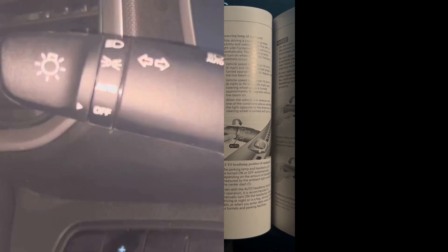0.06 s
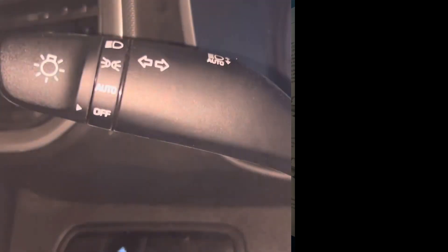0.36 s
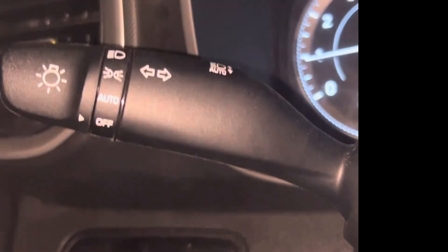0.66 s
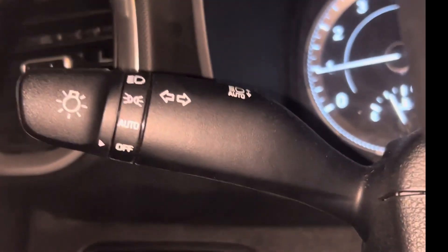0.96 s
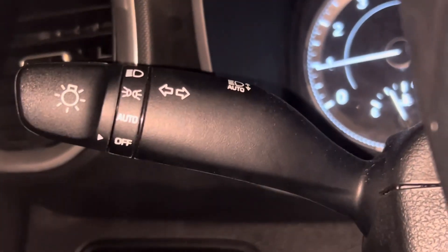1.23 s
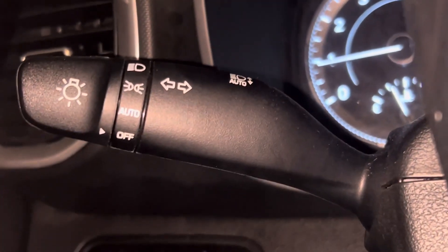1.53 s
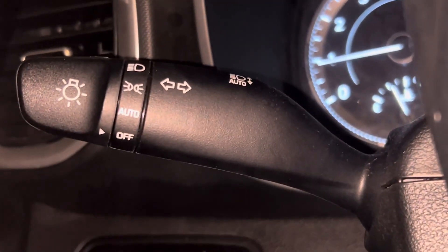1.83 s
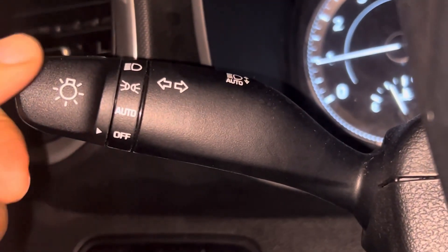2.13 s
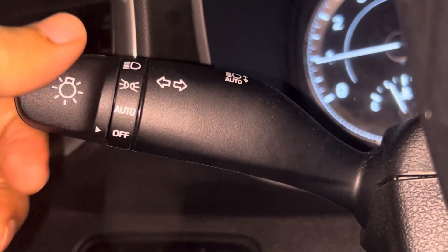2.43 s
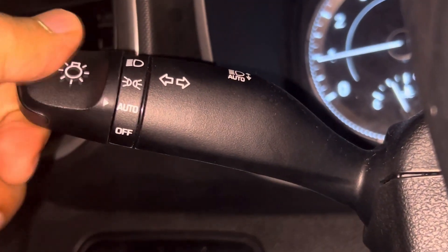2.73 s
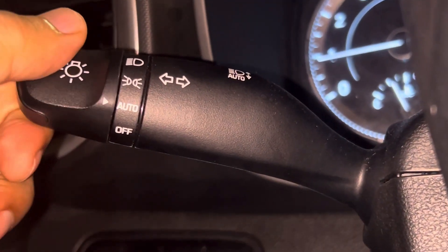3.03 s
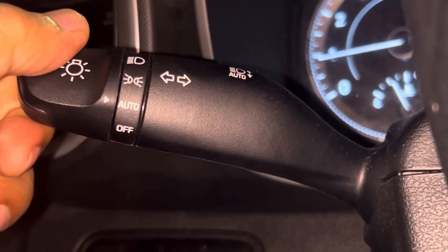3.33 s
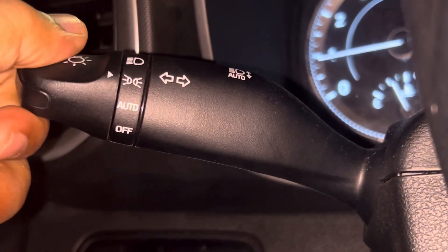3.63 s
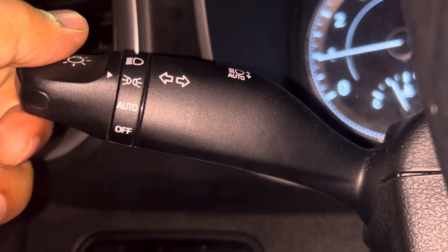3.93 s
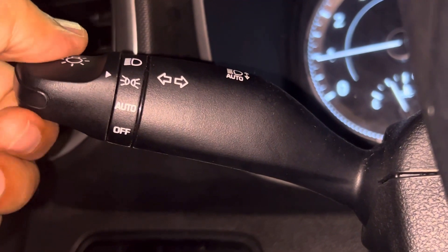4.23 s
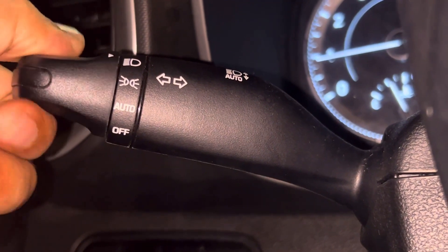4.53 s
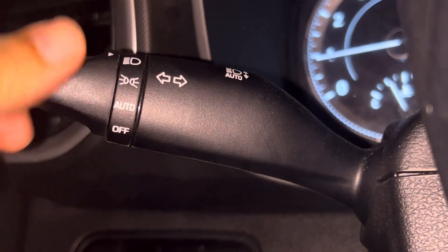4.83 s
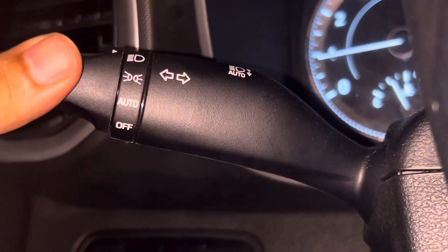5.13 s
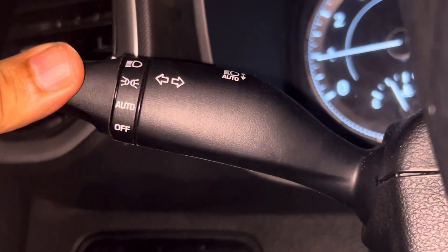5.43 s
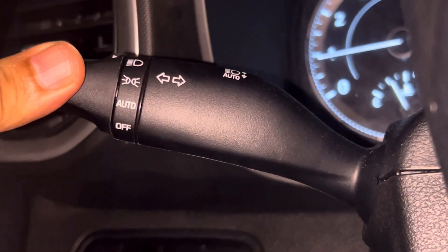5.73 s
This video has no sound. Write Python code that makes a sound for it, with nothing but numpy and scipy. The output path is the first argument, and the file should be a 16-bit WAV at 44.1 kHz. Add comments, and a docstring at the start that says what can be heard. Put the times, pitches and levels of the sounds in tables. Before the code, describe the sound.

A quiet, low hum and rumble of an idling engine, heard inside the car, runs throughout. It starts thin, drops out for an instant and returns with a tiny pop at 0.2 seconds. A light tap on the microphone comes at 0.7 seconds, then faint handling hisses and a soft tick around 1.4. After two tiny nail ticks near 2.5, the plastic headlight knob on the steering column stalk snaps through three stops at about 2.7, 3.5 and 4.3 seconds. These clicks are close, sharp, slightly hollow and a little to the right, the first two with a low thud. A tenth of a second after each, a relay ticks behind the dashboard. A lighter knock falls at 4.0, and soft ones around 4.6. Fingers bump the stalk with dull plastic knocks at 5.1 and 5.3, with soft scuffs and thuds until 5.5, leaving the hum.

```python
"""Inside an idling car, a hand turns the headlight knob on the steering column stalk by three clicks.
At each click stop (a detent) a plunger snaps home and sets the plastic stalk ringing. About a tenth
of a second later a relay, an electric switch behind the dashboard, answers with a rattle of contacts.
Soft hisses swell and fade, fingers bump the stalk, and the engine hums under it all.
The sound starts faint, drops out for a moment and comes back with a small pop."""
import sys
import numpy as np
from scipy import signal
from scipy.fft import rfft, irfft, next_fast_len
from scipy.io import wavfile

SR = 44100
rng = np.random.default_rng(int(sys.argv[2]) if len(sys.argv) > 2 else 0)


def unload_wav(signal):
    """Save mono or channel-first audio to the path in sys.argv[1] as 16-bit WAV at rate SR, clipped to [-1, 1]."""
    wavfile.write(
        sys.argv[1],
        SR,
        np.round(np.clip(np.atleast_2d(signal).T, -1, 1) * 32767).astype(np.int16),
    )


N = 254898
SIZE = 16384  # samples in one short sound
AGE, TIME = np.arange(SIZE) / SR, np.arange(N) / SR  # seconds into a short sound, and into the scene

# Tones of the idling engine. Each row: multiple of the firing rate, level in dB.
ENGINE_TONES = [(1, -50), (2, -61), (3, -55.5), (4, -56), (5, -62.5), (6, -66), (10, -73)]
# Rumble of the car body, and moving air. Each row: frequency in Hz, relative level in dB.
RUMBLE_COLOUR = [(15, -46.5), (35, -9), (52, 4.5), (66, 1.5), (85, 1), (105, 5.5), (135, -16.5), (185, -6),
                 (220, -13.5), (300, -12), (420, -25), (700, -63)]
AIR_COLOUR = [(200, -20.5), (500, 11.5), (750, 2), (1100, 4), (1400, -2.5), (1800, -3.5), (2400, -20.5),
              (3500, -22.5), (7000, -32.5), (10000, -41), (13000, -30), (15500, -41.5)]
# Thuds in the steering column, and jolts of the microphone. Each row: start in seconds, level in dB.
COLUMN_THUDS = [(2.749, -1.5), (3.511, -2), (5.326, -4), (5.354, -4.5), (5.469, -10)]
MIC_JOLTS = [(.718, -25.5), (1.015, -29)]
# Ringing of the steering column, the microphone case, the relay case and the stalk.
# Each row: pitch in Hz, relative level in dB, seconds to fall 60 dB when left to ring freely.
COLUMN_MODES = [(101.3, -30, .11), (139, -37.5, 0.12), (190, -35.5, 0.15)]
MIC_CASE_MODES = [(240, -21.5, 0.013), (550, -34, 0.018), (773, -32.5, 0.02), (2210, -50.5, 0.021),
                  (4100, -59, 0.019)]
RELAY_MODES = [(1893, -50.5, 0.058), (2235, -54.5, 0.064), (2640, -41, 0.02), (2930, -50, 0.048),
               (3350, -57, 0.035), (4090, -66, 0.12), (4530, -55, .05), (5400, -59, .03),
               (6330, -54, 0.035), (7050, -61, .03), (7940, -51.5, 0.039)]
STALK_MODES = [(362.2, -22.5, 0.079), (453, -34, 0.078), (585, -33, 0.076), (696, -33.5, 0.051),
               (800, -31.5, 0.031), (1038, -37, 0.065), (1235, -49, 0.11), (1460, -40, 0.05),
               (1740, -34, 0.066), (1885, -39, 0.06), (2215, -46.5, 0.05), (2480, -44.5, 0.045),
               (2728, -45.5, 0.03), (2950, -45, 0.045), (4030, -43, 0.028), (4250, -39.5, 0.026),
               (4480, -42, .035), (5270, -50, .025), (6090, -38.5, 0.025), (6340, -39, 0.024),
               (6700, -39.5, .026), (6930, -43, .026), (7600, -44.5, .024)]
# Swells of broad hiss and of more resonant hiss. Each row: time of full level, rise and hold,
# all in seconds, level in dB, extra treble in dB, fall in dB per second.
BROAD_SWELLS = [(.045, 0.075, 0.042, -77.5, 0, 107), (.715, 0.029, 0.064, -69, 4, 107),
                (.985, 0.022, 0.014, -78.5, 4.5, 130), (1.388, 0.026, 0.057, -57, -0.5, 111),
                (1.47, .03, 0.045, -58.5, 3.5, 97), (1.65, 0.076, 0.55, -72, 2.5, 105),
                (2.29, 0.067, 0.16, -77.5, 8.5, 103.5), (5.238, .004, .002, -80, 3, 108),
                (5.298, .007, 0.0074, -64.5, -3.5, 217)]
RESONANT_SWELLS = [(2.61, 0.044, 0.051, -69.5, -0.5, 104.5), (3.445, 0.014, .005, -71, 3, 128),
                   (3.491, 0.0044, 0.0071, -63, -2, 400), (3.975, 0.0075, 0.14, -66.5, 2.5, 104.5),
                   (4.1, 0.057, 0.13, -66.5, 1.5, 148), (4.3, 0.033, 0.041, -71.5, 6, 130),
                   (4.55, 0.011, 0.16, -67.5, 5, 150)]
# Tone of the broad hiss, the resonant hiss, and dragging finger pads.
# Each row: frequency in Hz, relative level in dB.
BROAD_COLOUR = [(300, -6), (900, 2), (1400, -3), (1750, 7.5), (2200, 4), (2550, 2), (3000, 1), (3700, -2),
                (5200, -1.5), (6200, -2.5), (7300, -4), (8500, -5), (9200, -5), (13000, -2.5), (15100, -3),
                (15500, -25)]
RESONANT_COLOUR = [(300, -5.5), (600, 2.5), (1000, 4.5), (1450, -3.5), (1750, 13), (2050, 7.5),
                   (2450, -0.5), (2900, 2.5), (3650, -1.5), (4100, 4), (4400, -1), (4800, 3), (5500, -9.5),
                   (6150, -1), (7000, -5.5), (8300, -3), (9200, -7.5), (12200, -3.5), (14500, -2),
                   (15500, -21)]
PAD_COLOUR = [(120, -6), (260, 6.5), (420, 2.5), (600, -4), (1000, -9.5), (1900, -10), (3200, -23),
              (9000, -41)]
# Finger pads dragging over plastic. Each row: middle in seconds, level in dB,
# seconds the swell spreads to either side, extra dB from 2 kHz up.
PAD_SCUFFS = [(0.79, -64, 0.069, 3), (1.0, -69.5, .018, 5.5), (1.378, -65.5, 0.033, 9),
              (4.591, -62, 0.017, 2), (4.703, -64, 0.028, -9), (5.111, -54, 0.036, -2.5),
              (5.321, -51, 0.039, -4.5), (5.482, -51.5, 0.055, -26)]
# Ticks of skin and nail on plastic. Each row: start in seconds, level in dB, extra treble in dB.
NAIL_TICKS = [(0.7042, -47, 22), (1.1216, -73, 25), (1.178, -73, 24), (1.358, -36, -7), (2.5133, -46, 5.5),
              (2.5700, -46, 7.5), (2.955, -70, 17), (3.9692, -43.5, 5.5), (4.774, -46, -9),
              (5.044, -48, -9), (5.091, -41, -9), (5.1320, -63, 14), (5.2373, -58, 11)]
# Rattling relay contacts, and the dry crack of a blow. Each row: frequency in Hz, gain in dB.
CONTACT_COLOUR = [(300, -15), (1500, -16), (2350, -1), (3600, -13), (4400, -7), (5600, -15), (6400, -10),
                  (7100, -19), (8100, -11), (9000, -19.5), (11600, -9.5), (15500, -16.5)]
CRACK_COLOUR = [(150, -18.5), (600, -13), (1500, -4), (2500, -0.5), (3400, -10), (4200, -1), (5000, -5),
                (5550, -12), (6200, -3.5), (6800, -5.5), (7400, -9.5), (8500, -9), (13000, -8),
                (16000, -15)]
# Dull knocks from fingers and the knob's end stop. Each row: start in seconds, level in dB, extra bass
# in dB, treble tilt in dB per octave, share of the free ring time, pitch factor, crack gain in dB.
STALK_KNOCKS = [(2.7541, -12, 0.5, -6.5, .6, 1.0, -2), (3.508, -14, 4.5, -8, 0.58, 1.2, 0),
                (3.9696, -6, -9, -5.5, 0.33, 1.05, -0.5), (4.3446, -8, 9, -19, 0.38, 1.185, 10),
                (4.577, -20.5, -3, -10, 0.56, 1.04, -4), (4.684, -19, -7, -10, .7, 1.0, -10),
                (5.0605, -3.5, -.5, -9, 0.71, 1.02, 4), (5.098, -14.5, 10, -8, 0.68, 1.055, 0),
                (5.3093, -11.5, 3, -6, 0.79, 1.04, -4), (5.3378, -6.5, -9, -7.5, 0.49, 1.02, -16)]
# The knob snapping into a detent. Each row: time in seconds, level in dB, extra bass in dB, treble tilt
# in dB per octave, share of the free ring time left by the grip, crack gain in dB, hollow boost in dB,
# knob pitch in Hz and level in dB, spring pitch in Hz and level in dB, scrape level in dB,
# relay delay in seconds, relay level in dB, extra relay treble in dB.
DETENT_SNAPS = [(2.7415, -0.5, 2.5, 0.65, 0.79, -0.5, 4, 2315, -41, 4500, -36, -40.5, 0.097, 2, -1.5),
                (3.5024, -3, -6, -2, 0.55, -4.5, 9, 2840, -32.5, 4860, -39.5, -43.5, 0.0958, -1, 6),
                (4.3332, -3.5, -2.5, -2.5, 0.74, -2.5, 9, 2950, -46, 4780, -36.5, -40, .0854, 1.4, 0)]
# Stereo width of the cabin and of the stalk. Each row: frequency in Hz, gain of the side signal in dB.
CABIN_WIDTH = [(30, -21), (70, -26.5), (115, -17.5), (200, -10), (380, -5), (700, -6), (1350, 2.5),
               (2400, -7.5), (4400, -31.5), (6500, -10), (8100, -5.5), (11000, -2), (15000, -11.5)]
STALK_SPREAD = [(200, -11.5), (380, -16), (700, -6), (1350, 2), (2400, -12.5), (4400, -21.5), (6500, -20),
                (8100, 0.5), (15000, 0)]
# Where the stalk sits between the ears. Each row: frequency in Hz, left minus right in dB.
STALK_BALANCE = [(200, 1), (380, -1), (700, -4), (1100, -1), (1750, -3), (3000, 0), (15000, 0)]
# The thin, faint opening, and the microphone's treble notch. Each row: frequency in Hz, gain in dB.
FAINT_OPENING = [(30, -20.5), (100, -9.5), (300, -17), (1200, -6)]
MIC_NOTCH = [(8800, 0), (9600, -16.5), (10300, -11), (11200, -4.5)]


def amp(db):
    """Turns decibels into a gain."""
    return 10 ** (np.asarray(db) / 20)


def unit(x):
    """Scales a signal to an average power of 1."""
    return x / np.sqrt(np.mean(x ** 2) + 1e-20)


def read(points, size):
    """Spreads a table of Hz and dB over all the frequencies of a spectrum."""
    hz, db = np.transpose(points)
    return np.interp(np.log(np.fft.rfftfreq(size, 1 / SR) + 1), np.log(hz), db)


def colour(x, points, power=1):
    """Shapes the tone with a table of Hz and dB, keeping attacks sharp."""
    size = next_fast_len(x.shape[-1] // 2 + 2048) * 2
    cepstrum = irfft(np.log(amp(power * read(points, size))), size)
    # folding it forward in time stops the filter from sounding early
    cepstrum[1:size // 2] *= 2
    cepstrum[size // 2 + 1:] = 0
    return irfft(rfft(x, size) * np.exp(rfft(cepstrum)), size)[..., :x.shape[-1]]


def add(mix, s, sound):
    """Mixes a sound in, starting at s seconds."""
    part = mix[:, round(s * SR):][:, :sound.shape[-1]]
    part += sound[..., :part.shape[-1]]


def fade(t60):
    """Falls by 60 dB every t60 seconds."""
    return np.exp(-np.log(1000) * AGE / t60)


def noise(size):
    """White noise as a pair: mid (what both ears share) and side (what sets them apart)."""
    return rng.standard_normal((2, size))


def wander(rate_hz):
    """A smooth random drift, mostly slower than rate_hz."""
    hz = np.fft.rfftfreq(N, 1 / SR)
    return unit(irfft(rfft(rng.standard_normal(N)) / (1 + (hz / rate_hz) ** 4), N))


def stereo(pair, width):
    """Turns mid and side into left and right."""
    side = irfft(rfft(pair[1]) * amp(read(width, N)), N)
    return np.array([pair[0] + side, pair[0] - side])


def ring(modes, build_cycles, scatter, share=1, lag_cycles=0):
    """A struck part rings with its own tones (modes). Each builds over cycles, so low ones come last."""
    out = np.zeros(SIZE, complex)
    for k, (hz, db, t60) in enumerate(modes):
        pitch_hz = hz * (1 + scatter * rng.standard_normal())
        turns = np.maximum(pitch_hz * AGE - lag_cycles, 0)
        build = 1 - np.exp(-(turns / build_cycles) ** 2)
        decay = 1000 ** (-turns / hz / (t60 * share))
        sign = (-1) ** k  # neighbouring modes swing opposite ways
        out += sign * amp(db) * build * decay * np.exp(2j * np.pi * turns)
    return np.array([out.real, out.imag])


def burst(width_s):
    """A very short clump of tiny impacts, as mid and side a quarter cycle apart."""
    envelope = np.exp(-((AGE - .001) / width_s) ** 2)
    spectrum = rfft(rng.standard_normal(SIZE) * envelope)
    evened = unit(np.abs(spectrum) ** .2) * np.linalg.norm(envelope)
    spectrum = evened * np.exp(1j * np.angle(spectrum))
    return np.array([irfft(spectrum), irfft(1j * spectrum)]) * (AGE < .1)


def cabin():
    """Engine tones and a fan tone waver over body rumble and moving air."""
    firing_hz, fan_hz, fan_db = 28.89, 73.9, -51.5
    turns = np.cumsum(firing_hz * (1 + 0.0024 * wander(1.57))) / SR
    hum = sum(amp(db + 1.2 * wander(5.9)) * np.exp(2j * np.pi * (k * turns + rng.random()))
              for k, db in ENGINE_TONES)
    hum += amp(fan_db + 2.2 * wander(0.74)) * np.exp(2j * np.pi * (fan_hz * TIME + rng.random()))
    rumble = amp(-49) * unit(colour(noise(N), RUMBLE_COLOUR))
    air = amp(-65.5 + 1.1 * wander(2.1)) * unit(colour(noise(N), AIR_COLOUR))
    return np.sqrt(2) * np.array([hum.real, hum.imag]) + rumble + air


def bumps():
    """The steering column thuds; the hand-held microphone is jolted and its case is tapped once."""
    jolt_hz, jolt_t60_s, tap_s = 45.2, 0.18, .7048
    out = np.zeros((2, N))
    for s, db in COLUMN_THUDS:
        add(out, s, amp(db) * ring(COLUMN_MODES, build_cycles=0.25, scatter=0.076))
    for s, db in MIC_JOLTS:
        add(out, s, ring([(jolt_hz, db, jolt_t60_s)], build_cycles=0.51, scatter=.02))
    add(out, tap_s, ring(MIC_CASE_MODES, build_cycles=0.52, scatter=0.0095, lag_cycles=0.88))
    return out * amp([[0], [4]])  # more side makes them wider


def swell_gain(swells):
    """The combined loudness of swells that each rise, hold and die away."""
    power = np.zeros(N)
    for s, rise, hold, db, fall_db_per_s in swells:
        before, after = np.maximum(s - TIME, 0), np.maximum(TIME - s - hold, 0)
        power += (np.exp(-before / rise) * amp(db - fall_db_per_s * after)) ** 2
    return np.sqrt(power)


def swelling_hiss(swells, spectrum, flutter_db=0.8):
    """A fine hiss rises, holds and fades; its highest part comes later and lingers."""
    treble_hz, lag_s, fall_share = 9500, .008, 0.73
    hiss = unit(colour(noise(N), spectrum))
    treble = irfft(rfft(hiss) * (np.fft.rfftfreq(N, 1 / SR) > treble_hz), N)
    body_gain = swell_gain([(s, rise, hold, db, fall) for s, rise, hold, db, _, fall in swells])
    treble_gain = swell_gain([(s + lag_s, rise, hold, db + treble_db, fall * fall_share)
                              for s, rise, hold, db, treble_db, fall in swells])
    treble_gain *= amp(0.85 * wander(14))
    flutter = amp(1 + flutter_db * wander(25))
    return ((hiss - treble) * body_gain + treble * treble_gain) * flutter


def hisses():
    """Swells of broad hiss and of more resonant hiss; the resonant one also swells at every detent."""
    lead_s, rise_s, hold_s = 0.012, 0.0095, 0.015
    db, treble_db, fall_db_per_s = -66.5, -2, 104
    at_detents = [(s - lead_s, rise_s, hold_s, db, treble_db, fall_db_per_s) for s, *_ in DETENT_SNAPS]
    broad = swelling_hiss(BROAD_SWELLS, BROAD_COLOUR)
    return broad + swelling_hiss(RESONANT_SWELLS + at_detents, RESONANT_COLOUR)


def scuffs():
    """Skin sticks and slips on plastic, making a dull, grainy swell."""
    slips_per_s, middle = 1200, AGE[-1] / 2
    out = np.zeros((2, N))
    for s, db, spread_s, bright_db in PAD_SCUFFS:
        slips = noise(SIZE) * (0.31 + (rng.random(SIZE) < slips_per_s / SR))
        sound = colour(unit(colour(slips, PAD_COLOUR)), [(450, 0.0061), (2000, bright_db)])
        swell = np.exp(-((AGE - middle) / spread_s) ** 2)
        add(out, s - middle, amp(db) * sound * swell)
    return out


def ticks():
    """Light touches of skin and nail crack without setting anything ringing."""
    out = np.zeros((2, N))
    for s, db, treble_db in NAIL_TICKS:
        tick = burst(width_s=0.00009) + amp(-14.5) * noise(SIZE) * fade(0.041)
        add(out, s, colour(colour(tick, CRACK_COLOUR), [(2500, db), (12000, db + treble_db)]))
    return out


def relay():
    """After each detent the contacts chatter briefly; the moving arm lands and the case rings."""
    bounces_per_s, bounce_db, chatter_s = 1200, 13, .0042
    swell = np.exp(-((AGE - chatter_s) / chatter_s) ** 2)
    out = np.zeros((2, N))
    for s, *_, delay, db, treble_db in DETENT_SNAPS:
        bounces = amp(bounce_db) * np.sign(noise(SIZE)) * (rng.random(SIZE) < bounces_per_s / SR)
        chatter = amp(-33) * unit(noise(SIZE) + bounces) * swell
        tail = amp(-45) * noise(SIZE) * fade(0.12)
        sound = colour(chatter + tail, CONTACT_COLOUR)
        add(sound, .003, ring(RELAY_MODES, build_cycles=3.1, scatter=0.0025, share=0.93))
        add(out, s + delay, colour(sound, [(4500, db), (12000, db + treble_db)]))
    return out


def blow(db, bass_db, tilt_db, share, pitch, crack_db):
    """A crack, the ringing stalk and a short cabin echo. Each hit has its own level, bass and tilt."""
    bass_hz, pivot_hz, top_hz = 360, 750, 16000
    top_db = db + tilt_db * np.log2(top_hz / pivot_hz)
    contact = [(bass_hz, db + bass_db), (pivot_hz, db), (top_hz, top_db)]
    tail = amp(-25.5) * fade(0.058 * share) + amp(-63) * fade(0.14 * share)
    crack = colour(amp(-19) * burst(width_s=.00045) + noise(SIZE) * tail, CRACK_COLOUR)
    modes = [(hz * pitch, mode_db, t60) for hz, mode_db, t60 in STALK_MODES]
    body = ring(modes, build_cycles=2.37, scatter=.002, share=share, lag_cycles=1.23)
    return colour(amp(crack_db) * crack + body, contact)


def stalk():
    """A plunger scrapes up its ramp and snaps home, knob and spring ping, and knocks hit the stalk."""
    knob_t60_s, spring_t60_s = .013, .015
    grip_pitch = 1.008  # while the knob is gripped, the stalk rings slightly sharp
    out = np.zeros((2, N))
    for (s, db, bass_db, tilt_db, share, crack_db, hollow_db,
         knob_hz, knob_db, spring_hz, spring_db, scrape_db, *_) in DETENT_SNAPS:
        scrape = colour(noise(SIZE) * amp(scrape_db) * fade(0.029), CRACK_COLOUR)
        add(out, s - SIZE / SR, scrape[:, ::-1])  # reversed, so it grows until the snap
        stalk_hollow = [(600, 0), (724, hollow_db), (970, 0)]  # a hollow boost around 724 Hz
        snap = blow(db, bass_db, tilt_db, share, grip_pitch, crack_db)
        add(out, s, colour(snap, stalk_hollow))
        # the grip sets the knob's pitch; how far the spring is squeezed sets the spring's
        pings = [(knob_hz, knob_db, knob_t60_s), (spring_hz, spring_db, spring_t60_s)]
        add(out, s, ring(pings, build_cycles=1.7, scatter=.003, lag_cycles=2.7))
    for s, *knock in STALK_KNOCKS:
        add(out, s, blow(*knock))
    return out


def scene():
    """The stalk sits a little to the right, with the cabin sound all around it."""
    left, right = stereo(stalk() + scuffs() + ticks(), STALK_SPREAD)
    knob = np.array([colour(left, STALK_BALANCE, power=.5), colour(right, STALK_BALANCE, power=-.5)])
    around = stereo(relay() + bumps() + hisses() + cabin(), CABIN_WIDTH)
    return knob + around * amp([[.3], [-.3]])


def record(dry):
    """Adds a faint start, a gap ending in a pop, a treble notch, a quick fade-out and a treble limit."""
    gap_from_s, gap_to_s, fade_out_s = 0.131, 0.1672, .006
    pop_db, top_hz = -42, 15500
    gated = np.where(TIME < gap_from_s, colour(dry, FAINT_OPENING), dry * (TIME > gap_to_s))
    ending = np.minimum((TIME[-1] - TIME) / fade_out_s, 1)
    sound = colour(gated, MIC_NOTCH) * ending
    add(sound, gap_to_s, amp(pop_db) * fade(.03))
    low_pass = signal.firwin(255, top_hz, window=("kaiser", 9), fs=SR)
    return signal.oaconvolve(sound, low_pass[None], "same")


dry = scene()
out = record(dry)
unload_wav(out)
```